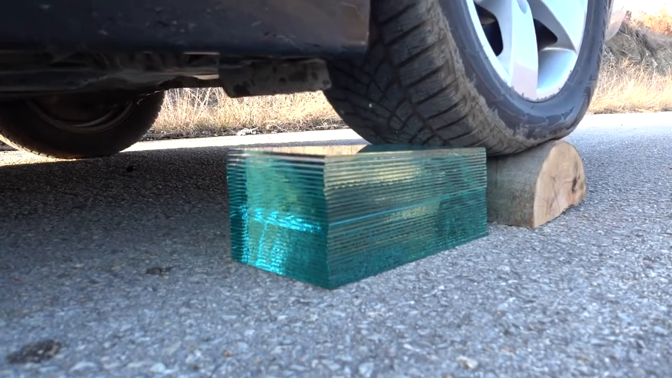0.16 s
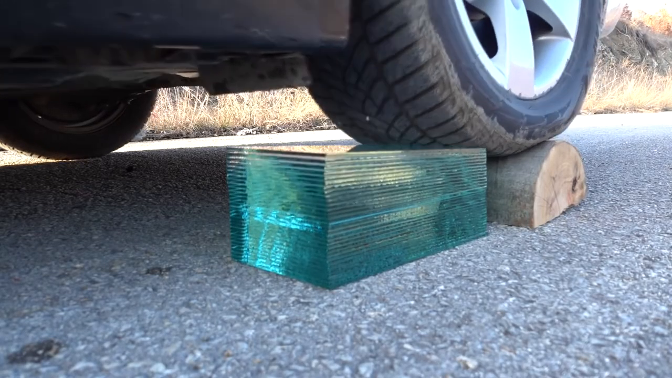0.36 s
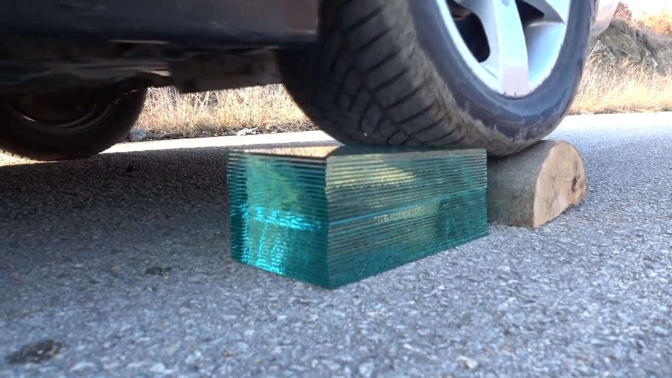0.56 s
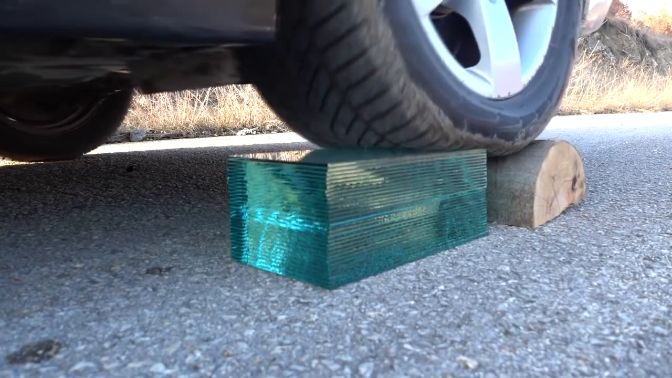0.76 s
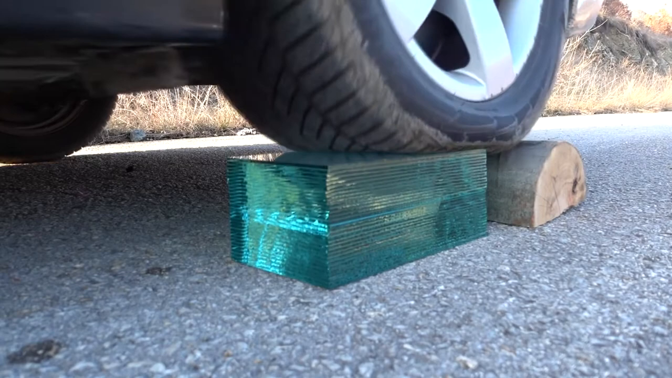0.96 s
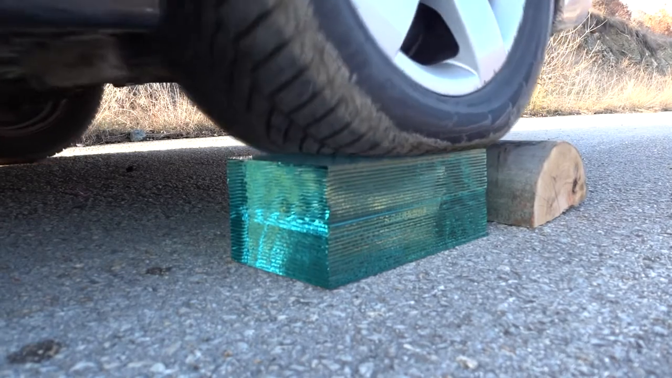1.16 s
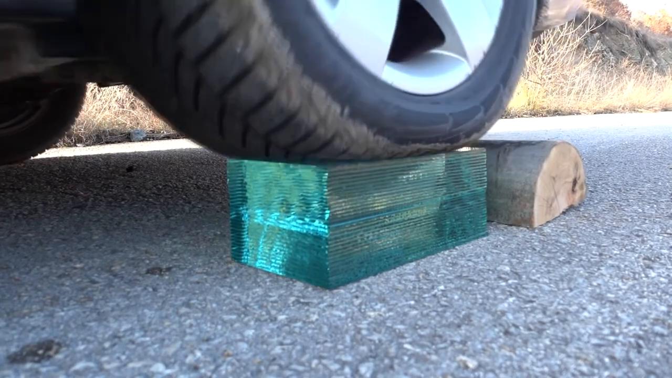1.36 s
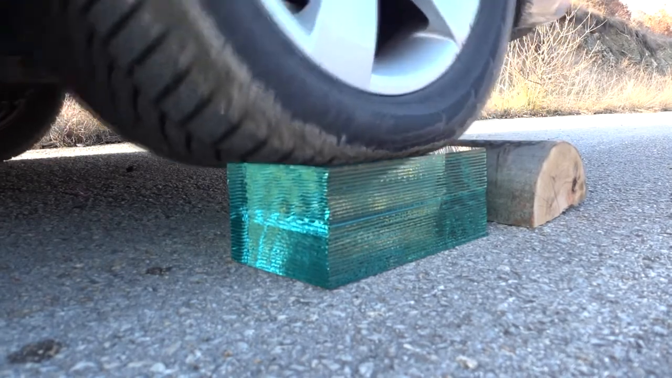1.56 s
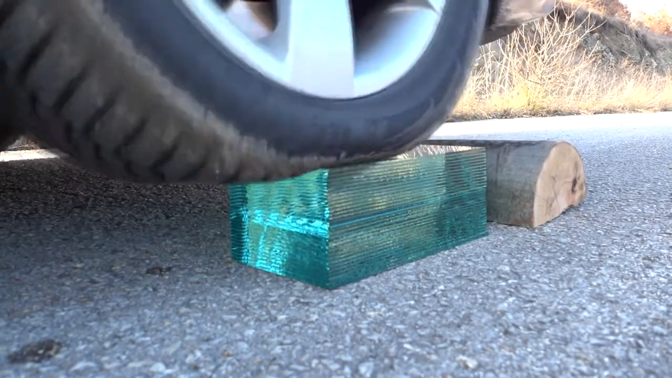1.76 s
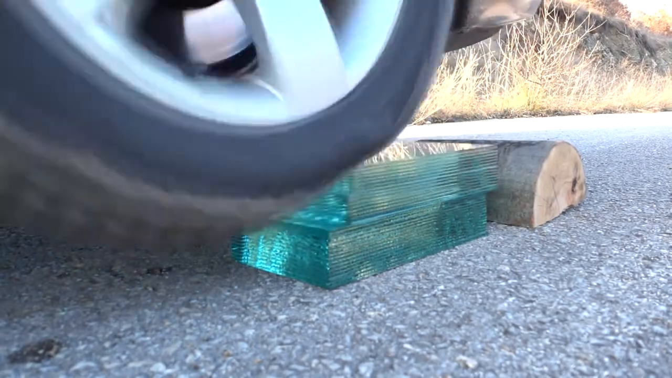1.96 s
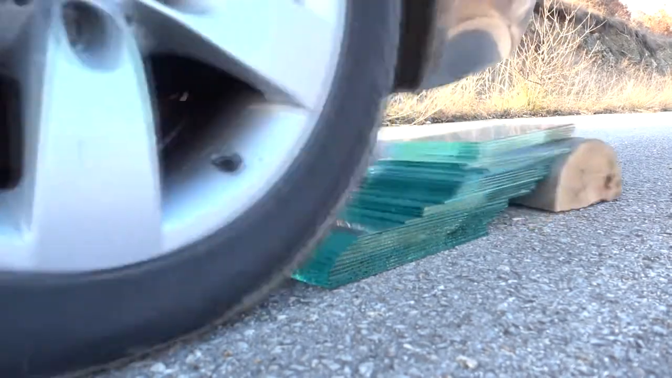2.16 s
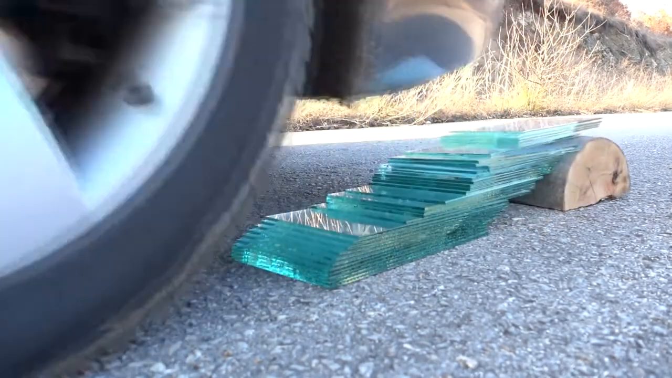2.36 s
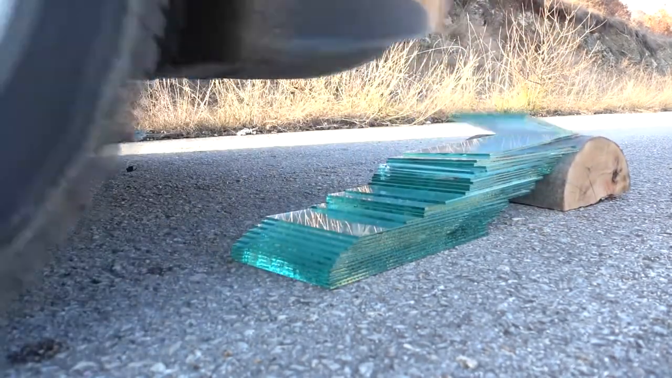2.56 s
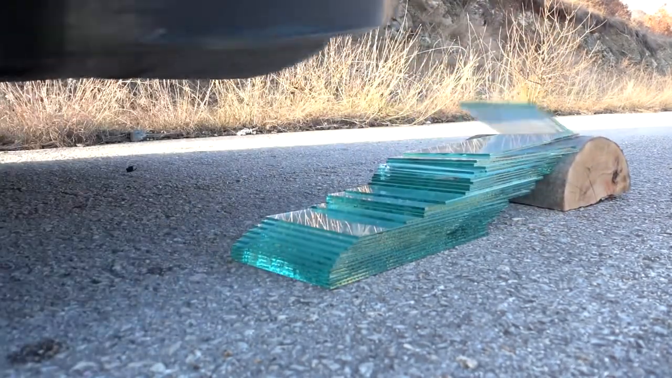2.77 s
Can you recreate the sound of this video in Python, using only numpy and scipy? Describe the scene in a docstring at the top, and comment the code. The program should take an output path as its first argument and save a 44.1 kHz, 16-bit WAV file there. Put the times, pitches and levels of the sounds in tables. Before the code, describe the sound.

Glass panes break under a car tyre, close and dry outdoors. After a faint rumble, sharp brittle snaps start at 0.2 s, splintery at first, then shorter and drier around 1.3 s, with fine gritty crackle between. From 2.05 to 2.35 s the stack slides apart in a dense clatter as the wheel drops with a low, hollow boom. Sparse knocks and small cracks settle over soft rumble and engine hum.

```python
"""A car rumbles and glass crackles faintly as a tyre rolls slowly over a stack of panes on asphalt.
The panes crack one after another: each crack is a snap, a dying run of noise and a ring of random pitches.
After about two seconds the stack slides apart in clattering grains of noise, and the wheel drops with
a boom of a few low tones. The last panes knock in short hollow noise bursts and settle;
the car rumbles on, as low coloured noise with an engine hum."""
import sys
import numpy as np
from scipy import signal
from scipy.fft import rfft, irfft, next_fast_len
from scipy.io import wavfile

SR = 44100
rng = np.random.default_rng(int(sys.argv[2]) if len(sys.argv) > 2 else 0)


def materialize(psi):
    """Save the field psi as 16-bit PCM at rate SR to the path in sys.argv[1].

    A 1-D psi becomes a single channel; in a 2-D psi each row is a channel.
    """
    bounded = np.clip(np.atleast_2d(psi).T, -1, 1)
    quanta = np.round(bounded * 32767).astype(np.int16)
    wavfile.write(sys.argv[1], SR, quanta)


N = 125685
TIME = np.arange(N) / SR

# Rumble of the car over time. Each row: time in seconds, level in dB.
RUMBLE_LEVEL = [(0, -34), (.07, -43), (.22, -61), (1.96, -49.5), (2.06, -24), (2.12, -17.5), (2.22, -33.5),
                (2.4, -33), (2.6, -43), (2.85, -43.5)]
# Tone colour of the rumble. Each row: frequency in Hz, level in dB.
RUMBLE_COLOUR = [(20, -13), (45, -6), (75, 0), (140, 1.5), (240, 5), (330, -6.5), (1500, -63)]
HUM_HZ, HUM_WIDTH_HZ, HUM_DB, HUM_FROM_S = 136, 10.7, -42, 2.3

# Tone colour of the open air. Each row: frequency in Hz, level in dB.
AIR_COLOUR = [(30, -39), (500, -4), (1300, -21), (3500, -20), (11000, -21.5)]
AIR_DB = -53.5

# Fine crackle between the loaded panes. Each row: time in seconds, level in dB.
CRACKLE_LEVEL = [(0, -56.5), (.45, -50.5), (.72, -32), (.97, -36), (1.2, -48.5), (1.45, -37), (1.7, -40),
                 (1.9, -32.5), (2.1, -73)]
CRACKLE_PER_S, CRACKLE_SPREAD_DB, CRACKLE_RING_MS = 300, 4.5, 1
AFTER_DB, AFTER_S = -12.5, 0.0063  # each crack also stirs up crackle for a moment

# Loose panes knocking together. Each row: start in seconds, level in dB (before KNOCK_GAIN_DB),
# pitch in Hz, decay in ms.
KNOCKS = [(.001, -35.5, 174, 11), (.478, -39, 264, 2.8), (1.725, -28.5, 580, 4.5), (1.790, -32, 560, 11),
          (1.983, -31.5, 444, 18), (2.061, -21.5, 550, 12.7), (2.111, -23.5, 820, 16),
          (2.199, -23.5, 580, 7.8), (2.211, -22.5, 2000, 16), (2.342, -24.5, 720, 9.5),
          (2.414, -35, 610, 31), (2.511, -24, 650, 11), (2.774, -34, 650, 24.7)]
KNOCK_GAIN_DB, KNOCK_WIDTH, KNOCK_RISE_MS = 5.5, 0.52, 2.2  # the width is a share of the pitch

# Panes cracking. Each row: start in seconds, level in dB (before CRACK_GAIN_DB),
# treble in dB against the core of the crack (before TREBLE_GAIN_DB).
CRACKS = [(0.2012, -27.5, -5), (0.214, -30, 3), (0.2333, -18, -13.5), (0.2615, -24, -2), (0.29, -19.5, 0),
          (0.3393, -21, -1.5), (0.3447, -37.5, 11.5), (0.355, -33, -20), (0.4558, -20.5, -5.5),
          (0.4608, -38, 7.5), (0.524, -24, 1.5), (0.5359, -20, -6.5), (0.58, -23, 3), (0.587, -27, 9),
          (0.5965, -23.5, -2.5), (0.6398, -31, 5.5), (0.6655, -23, -3), (0.699, -25.5, -2),
          (0.713, -21.5, -9), (0.728, -23.5, -8), (0.7495, -19, -1.5), (0.826, -19.5, -2),
          (0.8367, -21.5, -7), (0.882, -24, -8), (0.9073, -22.5, -11), (0.937, -18.5, -7),
          (0.9597, -25, -11), (0.968, -27, -6.5), (1.008, -34, -7), (1.061, -22.5, -5.5),
          (1.119, -21.5, -9), (1.1317, -26.5, -11), (1.23, -34, -6.5), (1.2531, -23.5, -7.5),
          (1.284, -35, -12), (1.3519, -31, -3.5), (1.3741, -34.5, -13), (1.3923, -19.5, -26),
          (1.4173, -30, -11), (1.4283, -22.5, -3.5), (1.4513, -26.5, -9), (1.463, -25.5, -6),
          (1.4795, -24.5, -6), (1.505, -31.5, -1), (1.557, -28.5, -0.5), (1.5653, -25, -3),
          (1.5799, -22, -1.5), (1.5941, -26, -1), (1.6713, -26.5, 1.5), (1.726, -23, 3), (1.737, -21, -8),
          (1.7937, -21, -1), (1.8226, -26.5, -2), (1.8317, -18.5, -3.5), (1.8625, -22, -1),
          (1.9624, -30, -3.5), (2.1633, -20.5, -7.5), (2.32, -25, -14), (2.594, -30.5, -4),
          (2.6326, -30.5, -13), (2.685, -32.5, -1)]
# How long a crack runs. Each row: time in seconds, decay in ms.
SPLINTERING = [(.25, 8.5), (.6, 4.5), (.9, 2.5), (1.3, 1.1), (1.75, 3.9), (2.6, 3.8)]
# Main resonance of the breaking pane, before a small random change. Each row: time in seconds, pitch in Hz.
PANE_HZ = [(.3, 4160), (.8, 3080), (1.6, 3120)]
# Low body of the cracks. Each row: time in seconds, level in dB against the core.
BODY_LEVEL = [(.3, -31.5), (.6, -10.5), (.85, -12), (1.3, -15.5), (1.8, -11)]
CRACK_GAIN_DB, SNAP_MS, SNAP_WIDTH_HZ = 1, 3.2, 2310  # cracks that are brief against SNAP_MS are mostly snap
GRAIN_DB, RISE_SHARE = 4, 0.049  # unevenness of the run; its rise time as a share of its decay
CORE_BELOW, CORE_ABOVE = 0.74, 1.47  # edges of the fracture band, as multiples of the pane's resonance
TREBLE_GAIN_DB, TREBLE_EDGE_HZ = -0.5, 4800
BODY_LOW_HZ, BODY_HIGH_HZ, BODY_LINGER_MS = 437, 1580, 6.7
RING_DB, RING_T60_S = -6, 0.052  # T60 is the time to fall by 60 dB

# Clatter of the sliding stack. Each row: time in seconds, level in dB (before CLATTER_GAIN_DB).
CLATTER_LEVEL = [(1.97, -45), (2.05, -28), (2.075, -19.5), (2.22, -21), (2.345, -26), (2.38, -35),
                 (2.48, -36), (2.53, -29), (2.65, -35.5), (2.72, -44), (2.85, -46)]
# Its fine splinters. Each row: time in seconds, level in dB (before SPLINTER_GAIN_DB).
SPLINTER_LEVEL = [(1.98, -46), (2.1, -26), (2.155, -24), (2.17, -21), (2.335, -23), (2.375, -43),
                  (2.47, -54), (2.54, -36), (2.63, -42.5), (2.72, -68), (2.85, -81)]
# Tone colour of the clatter. Each row: frequency in Hz, level in dB.
CLATTER_COLOUR = [(200, -3.5), (400, -2), (650, 2.5), (1200, 0.5), (2100, -3.5), (3000, -9.5),
                  (6000, -25.5)]
# Tone colour of splinters and fine crackle. Each row: frequency in Hz, level in dB.
SPLINTER_COLOUR = [(700, -9), (1600, 1.5), (2600, 3), (4200, 2), (6000, -0.5), (8500, -3), (11000, -11)]
CLATTER_GAIN_DB, CLATTER_PER_S, CLATTER_RING_MS = -0.5, 540, 3.8
SPLINTER_GAIN_DB, SPLINTERS_PER_S, SPLINTER_RING_MS = 3, 750, 2.8
SIZE_SPREAD_DB = 3.0

# Bumps of the landing wheel. Each row: start in seconds, level in dB.
LANDINGS = [(2.062, -19), (2.079, -14), (2.095, -19.5)]
# Ringing tones of the tyre. Each row: pitch in Hz, level in dB, time to fall by 60 dB in seconds.
TYRE_MODES = [(171, -14.5, 0.44), (221.8, 1.5, 0.49), (255, -3, 0.27)]

# How alike left and right are in the steady noises. Each row: frequency in Hz, likeness from 0 to 1.
LIKENESS = [(150, 1), (700, 0.85), (2500, 0.73), (9000, 0.1)]
# Lean of the glass to one side. Each row: time in seconds, left minus right in dB.
LEAN_DB = [(.3, -0.6), (2.3, 0.5), (2.7, 2.5)]
CRACK_WIDTH, TREBLE_WIDTH = 0.083, 0.49  # stereo width: 0 is the same on both sides
ECHO_DB, ECHO_DECAY_MS = -11, 4.3  # between road and underbody
TAIL_DB, TAIL_DECAY_MS = -15, 45  # the roadside
PEAK_LIMIT, CUTOFF_HZ = 0.76, 11100  # full scale is 1


def from_db(db):
    """Turn decibels into gain."""
    return 10 ** (np.asarray(db) / 20)


def rms_one(x):
    """Scale to an rms (average strength) of 1."""
    return x / np.sqrt(np.mean(x ** 2) + 1e-20)


def burst_one(x, span_s=.007):
    """Scale a burst to the energy of a sound of rms 1 that lasts span_s."""
    energy = np.mean(np.sum(x ** 2, -1))
    return x / np.sqrt(energy / (span_s * SR) + 1e-20)


def at_time(rows, s):
    """Read a table at a time, on straight lines between its rows."""
    return np.interp(s, *np.transpose(rows))


def level(rows):
    """Turn a table of levels into gain over time."""
    return from_db(at_time(rows, TIME))


def at_hz(points, size):
    """Read a table at each frequency of a transform."""
    hz, value = np.transpose(points)
    bins_hz = np.arange(size // 2 + 1) * SR / size
    return np.interp(np.log(bins_hz + 1), np.log(hz), value)


def band(x, low_hz, high_hz, order=2):
    """Keep only the sound between two frequencies."""
    sos = signal.butter(order, [low_hz, min(high_hz, SR / 2 - 1)], "band", fs=SR, output="sos")
    return signal.sosfilt(sos, x + 1e-18)


def spread(pair, width):
    """Make left and right from two unrelated signals."""
    return pair[0] + width * pair[1] * np.array([[1], [-1]])


def stereo_noise(points, envelope=1):
    """Shape noise in time, then in tone colour, wider toward the treble; rms 1."""
    size = next_fast_len(N + 4096)
    mid, side = rfft(rng.standard_normal((2, N)) * envelope, size)
    alike = np.clip(at_hz(LIKENESS, size), 0, 1)
    both = spread((np.sqrt(1 + alike) * mid, side), np.sqrt(1 - alike))
    coloured = both * from_db(at_hz(points, size))
    return rms_one(irfft(coloured, size)[:, :N])


def grains(per_s, spread_db, ring_ms):
    """Make the loudness curve of random small contacts of uneven size, each dying fast."""
    sizes = from_db(spread_db * np.minimum(rng.exponential(1, N), 4))
    born = rng.random(N) < per_s / SR
    keep = np.exp(-2000 / (ring_ms * SR))  # energy dies twice as fast as amplitude
    return np.sqrt(signal.lfilter([1], [1, -keep], born * sizes ** 2 + 1e-12))


def add(out, s, x):
    """Mix x in at time s."""
    i = int(np.clip(s * SR, 0, N - 1))
    out[:, i:i + x.shape[1]] += x[:, :N - i]


def car():
    """Rolling rumble is low coloured noise; the engine hum is a narrow band of noise that enters late."""
    hum = rms_one(band(rng.standard_normal(N), HUM_HZ - HUM_WIDTH_HZ / 2, HUM_HZ + HUM_WIDTH_HZ / 2))
    rumble = level(RUMBLE_LEVEL) * stereo_noise(RUMBLE_COLOUR)
    return rumble + from_db(HUM_DB) * hum * (TIME > HUM_FROM_S)


def open_air():
    """The open air is a faint steady noise."""
    return from_db(AIR_DB) * stereo_noise(AIR_COLOUR)


def crackle(breaks):
    """Crumbs of glass grind between the loaded panes, with more crackle just after a crack."""
    keep = np.exp(-1 / (AFTER_S * SR))
    power = np.mean(breaks ** 2, axis=0)
    stirred = np.sqrt(signal.lfilter([1 - keep], [1, -keep], power + 1e-18))
    crumbs = stereo_noise(SPLINTER_COLOUR, grains(CRACKLE_PER_S, CRACKLE_SPREAD_DB, CRACKLE_RING_MS))
    return (level(CRACKLE_LEVEL) + from_db(AFTER_DB) * stirred) * crumbs


def knocks():
    """Whole panes slap on each other with a hollow, chattering knock."""
    out, t = np.zeros((2, N)), TIME[:SR // 5]
    ms = 1000 * t
    for s, db, hz, decay_ms in KNOCKS:
        envelope = np.exp(-ms / decay_ms) * (1 - np.exp(-ms / KNOCK_RISE_MS))
        chatter = spread(rng.standard_normal((2, len(t))), CRACK_WIDTH) * envelope
        edge = 1 + KNOCK_WIDTH / 2
        hollow = band(chatter, hz / edge, hz * edge, order=1)
        hollow = band(hollow, hz / 5.8, hz * 1.7, order=1)
        add(out, s, from_db(db + KNOCK_GAIN_DB) * burst_one(hollow, decay_ms / 1000))
    return out


def cracks():
    """Each crack is a snap of the pane and a dying run of tiny fractures, with the ring of the pieces."""
    out, t = np.zeros((2, N)), TIME[:SR // 8]
    ms = 1000 * t
    for s, db, treble_db in CRACKS:
        decay_ms = at_time(SPLINTERING, s)
        snap_share = np.exp(-decay_ms / SNAP_MS)
        # The run is noise whose level jumps every 16 samples.
        jumps_db = GRAIN_DB * np.repeat(rng.standard_normal(len(t)), 16)[:len(t)]
        run = rng.standard_normal((2, len(t))) * from_db(jumps_db)
        run = run * (1 - np.exp(-ms / (RISE_SHARE * decay_ms)))
        splinters = run * np.exp(-ms / decay_ms)
        lingering = run * np.exp(-ms / (decay_ms + BODY_LINGER_MS))

        hz = at_time(PANE_HZ, s) * np.exp(.06 * rng.standard_normal())
        click = 1. * (t == 0)
        snap = burst_one(band(click, max(hz - SNAP_WIDTH_HZ / 2, 100), hz + SNAP_WIDTH_HZ / 2))
        fracture = burst_one(band(spread(splinters, CRACK_WIDTH), hz * CORE_BELOW, hz * CORE_ABOVE))
        core = burst_one(np.sqrt(snap_share) * snap + np.sqrt(1 - snap_share) * fracture)
        treble = burst_one(band(spread(splinters, TREBLE_WIDTH), TREBLE_EDGE_HZ, CUTOFF_HZ))
        body = burst_one(band(spread(lingering, CRACK_WIDTH), BODY_LOW_HZ, BODY_HIGH_HZ))

        crack = core + from_db(treble_db + TREBLE_GAIN_DB) * treble
        crack = crack + from_db(at_time(BODY_LEVEL, s)) * body
        crack = crack + from_db(RING_DB) * (1 - snap_share) * shard_ring(t)
        add(out, s, from_db(db + CRACK_GAIN_DB) * crack)
    return out


def shard_ring(t, count=14):
    """A freshly broken piece rings at random pitches that die away together."""
    pitch, size = rng.random((count, 1)), rng.standard_normal((2, count))
    hz = 2100 * 4.5 ** (pitch ** 1.6)  # crowded toward the low end
    modes = np.sin(2 * np.pi * hz * t) * from_db(-60 * t / RING_T60_S)
    return burst_one(spread(size @ modes, TREBLE_WIDTH))


def crunch():
    """The sliding stack clatters and splinters in many small random contacts."""
    clatter_grains = grains(CLATTER_PER_S, SIZE_SPREAD_DB, CLATTER_RING_MS)
    clatter = level(CLATTER_LEVEL) * stereo_noise(CLATTER_COLOUR, clatter_grains)
    splinter_grains = grains(SPLINTERS_PER_S, SIZE_SPREAD_DB, SPLINTER_RING_MS)
    splinters = level(SPLINTER_LEVEL) * stereo_noise(SPLINTER_COLOUR, splinter_grains)
    sliding = TIME > CLATTER_LEVEL[0][0]
    return sliding * (from_db(CLATTER_GAIN_DB) * clatter + from_db(SPLINTER_GAIN_DB) * splinters)


def landing():
    """The tyre drops off the stack in a few quick bumps, each booming at the tyre's own low tones."""
    out, boom = np.zeros((2, N)), np.zeros(N)
    for hz, db, t60_s in TYRE_MODES:
        boom += from_db(db - 60 * TIME / t60_s) * np.sin(2 * np.pi * hz * TIME)
    for s, db in LANDINGS:
        add(out, s, from_db(db) * boom[None])
    return out


def reflections(x):
    """Quick echoes between road and underbody, and a faint outdoor tail, are fading noise responses."""
    ms = 1000 * TIME[:SR // 3]
    response = 0
    for db, decay_ms in ((ECHO_DB, ECHO_DECAY_MS), (TAIL_DB, TAIL_DECAY_MS)):
        noise = spread(rng.standard_normal((2, len(ms))), 0.45)
        echoes = noise * np.exp(-ms / decay_ms) * (ms > 2)
        response = response + from_db(db) * burst_one(echoes, 1 / SR)
    return signal.fftconvolve(x, response, axes=1)[:, :N]


def scene():
    """Glass, tyre and car sound together in the open air."""
    breaks = cracks()
    glass = crackle(breaks) + knocks() + breaks + crunch()
    glass = glass * level(LEAN_DB) ** np.array([[.5], [-.5]])  # half the lean on each side
    return car() + open_air() + glass + reflections(glass) + landing()


def record(dry):
    """Round the peaks and cut off the top frequencies."""
    rounded = PEAK_LIMIT * np.tanh(dry / PEAK_LIMIT)
    return signal.sosfilt(signal.ellip(10, .3, 70, CUTOFF_HZ, fs=SR, output="sos"), rounded)


dry = scene()
out = record(dry)
materialize(out)
```